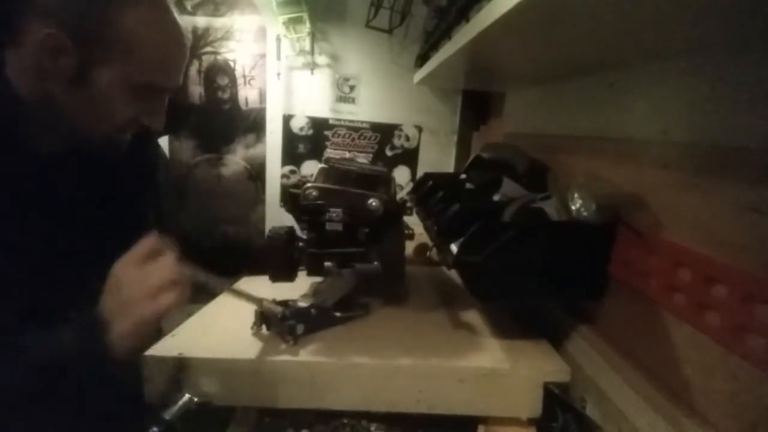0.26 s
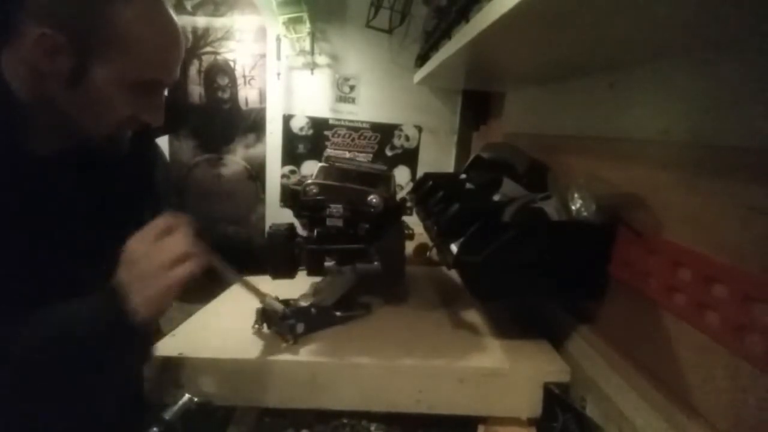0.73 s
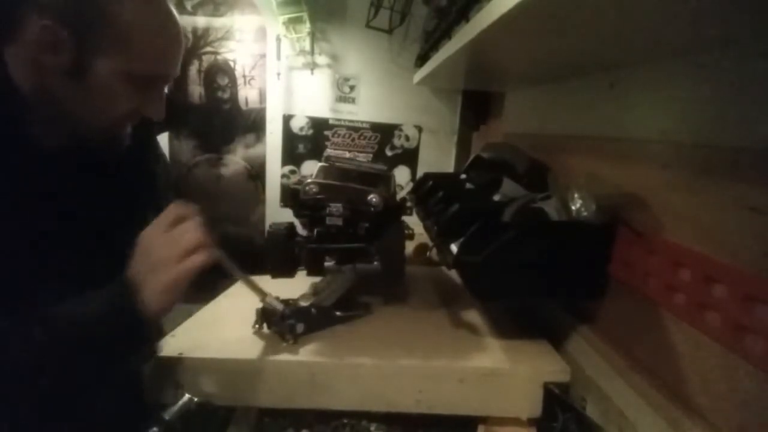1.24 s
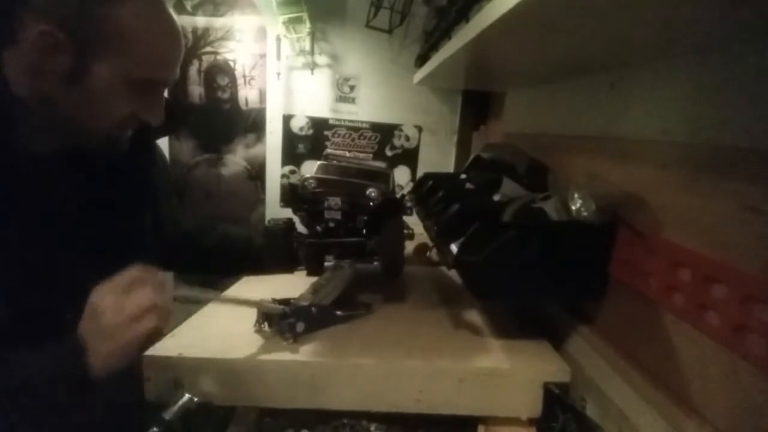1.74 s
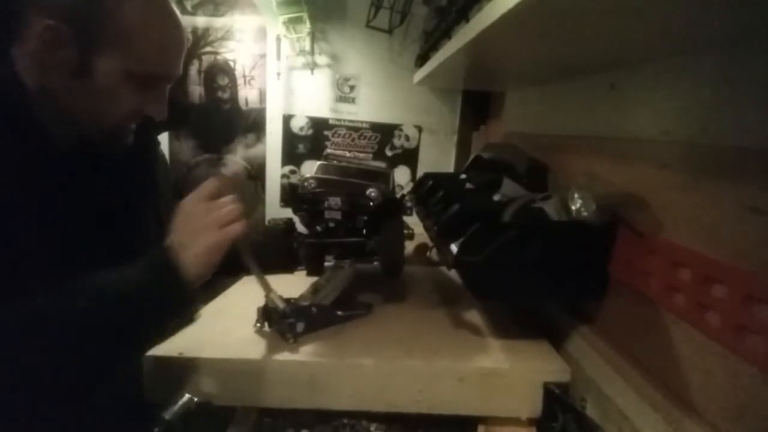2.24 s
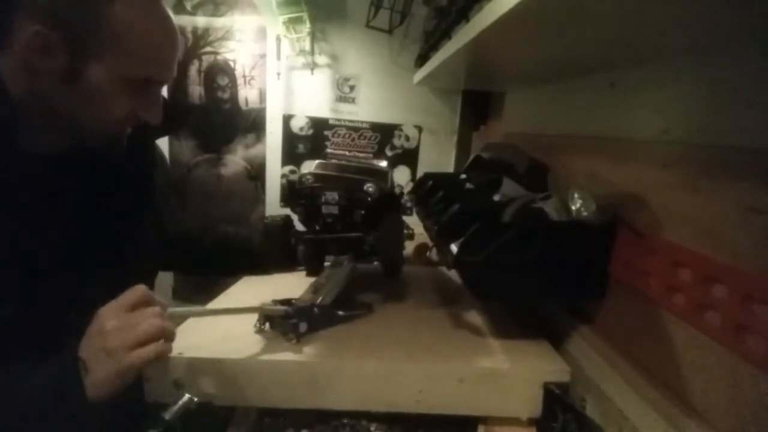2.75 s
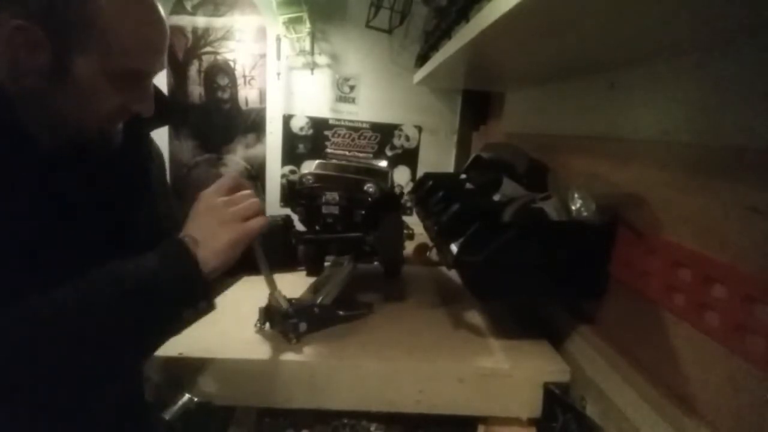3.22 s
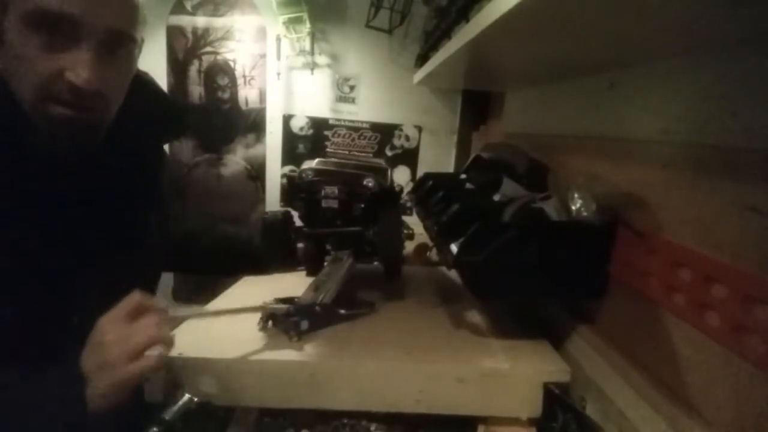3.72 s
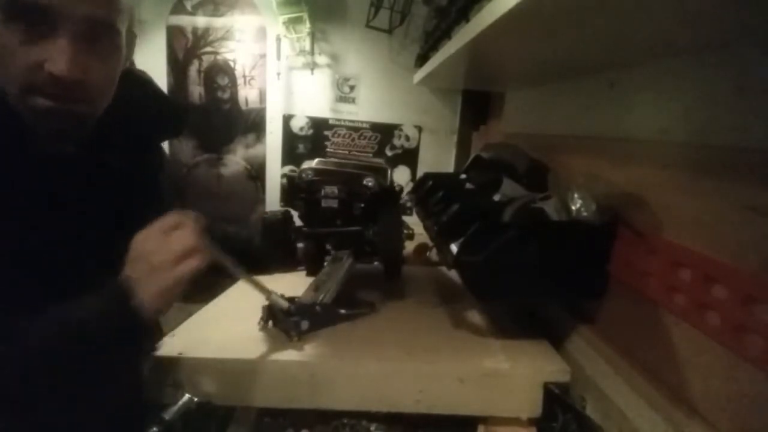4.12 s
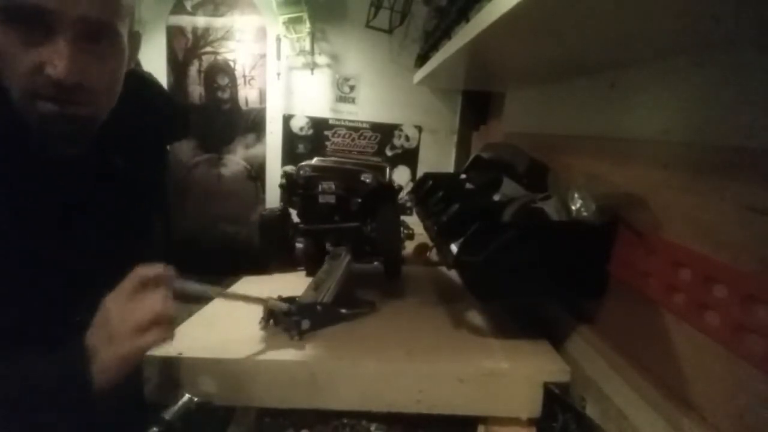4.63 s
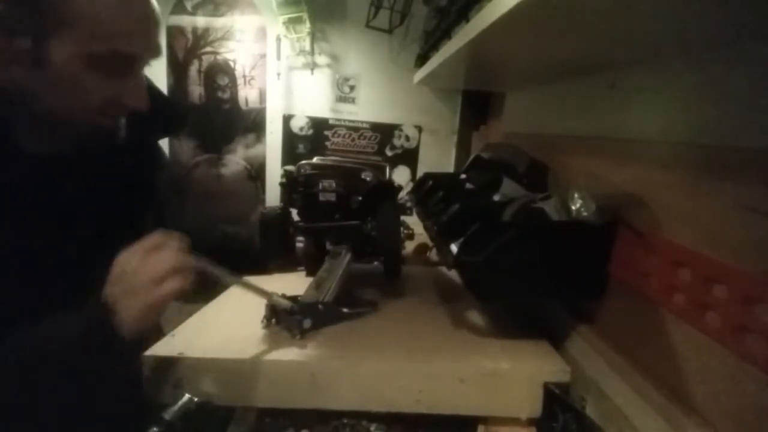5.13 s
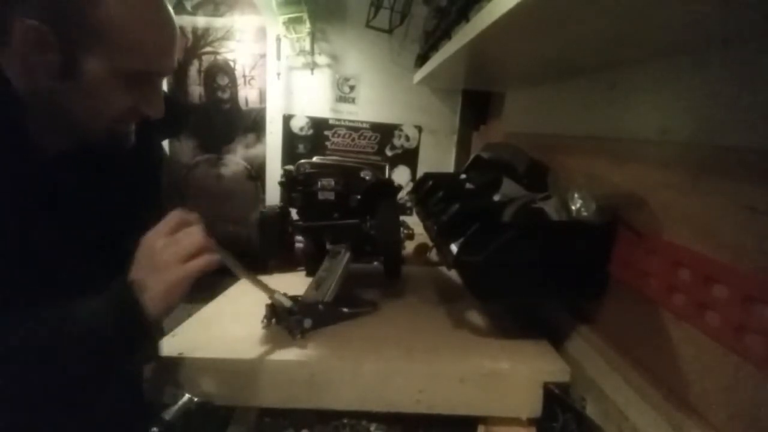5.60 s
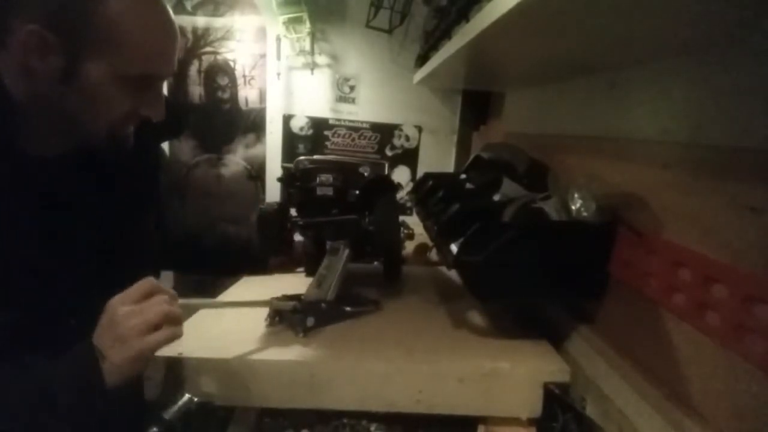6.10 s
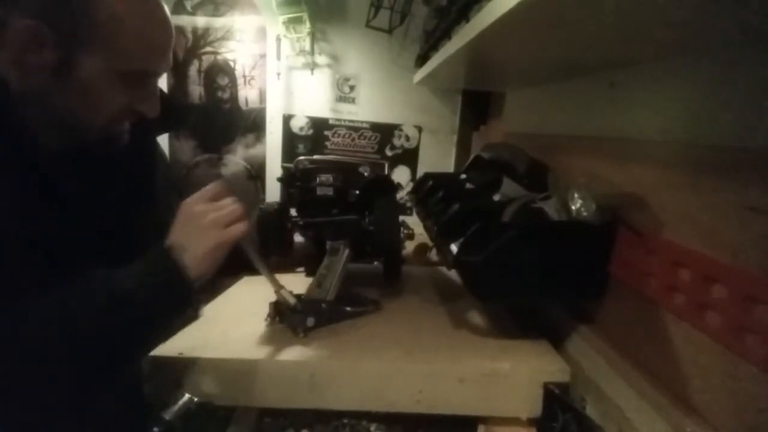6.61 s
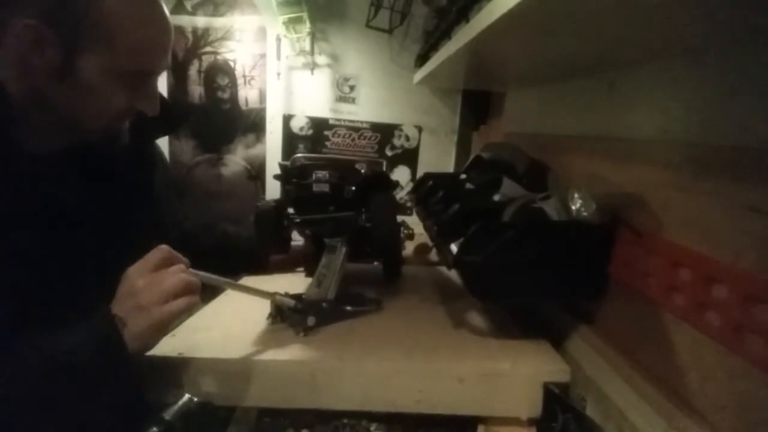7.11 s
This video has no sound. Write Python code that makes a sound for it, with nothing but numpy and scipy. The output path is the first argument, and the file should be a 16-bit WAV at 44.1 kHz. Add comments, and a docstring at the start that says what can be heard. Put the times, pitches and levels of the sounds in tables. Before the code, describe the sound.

Close to the microphone, a small metal jack is pumped on a wooden desk. Loose joints click and rattle in irregular clusters, some sharp and bright, others only dull knocks through the wood. A tiny creak comes past the middle. The quiet room answers briefly, while outside a low vehicle drone slowly rises in pitch over traffic rumble. Thin hiss lies on top, in stereo.

```python
"""Floor jack pumped on a desk

A small aluminium floor jack is pumped by hand on a wooden desk. Its loose links rattle and click as spiky noise
bursts, which ring the frame and thump the desk top through resonances. The pivot creaks once, as a rising sine.
A quiet room answers with fading noise. Outside, a vehicle drones upward in pitch as an unsteady sine, over
traffic rumble, room tone and hiss made of shaped noise. Two microphone ports sit close to the desk; their
resonance is heard as a lift of the clicks and hiss in the high treble."""
import sys
import numpy as np
from scipy import signal
from scipy.fft import rfft, irfft, next_fast_len
from scipy.io import wavfile
from scipy.ndimage import uniform_filter1d, map_coordinates

SR = 44100
rng = np.random.default_rng(int(sys.argv[2]) if len(sys.argv) > 2 else 0)


def gain_from_db(level_db):
    """Turn a decibel level (scalar or array-like) into a linear amplitude factor."""
    decades = np.asarray(level_db, float) / 20
    return 10 ** decades


def materialize(psi):
    """Save the field psi as 16-bit PCM at rate SR to the path in sys.argv[1].

    A 1-D psi becomes a single channel; in a 2-D psi each row is a channel.
    """
    bounded = np.clip(np.atleast_2d(psi).T, -1, 1)
    quanta = np.round(bounded * 32767).astype(np.int16)
    wavfile.write(sys.argv[1], SR, quanta)


N = 324249  # length of the scene in samples


# Contacts of the linkage: t/s, click level/dB, desk thump level/dB, frame ring level/dB (before fixed offsets)
CONTACTS = [(0.135, -78, -63.5, -63), (0.257, -50, -65, -60), (0.2693, -39.5, -49.5, -53),
            (0.2785, -37, -39.5, -53), (0.471, -65, -80, -64), (0.5301, -59.5, -38, -59.5),
            (0.6764, -73, -45.5, -71), (0.798, -82, -60, -64), (0.948, -55, -51.5, -54),
            (0.974, -53, -49, -59), (1.2982, -55, -74, -66), (1.3073, -44, -44, -50.5),
            (1.332, -38.5, -39.5, -48), (1.79, -78, -52.5, -85), (1.9769, -75, -63, -63),
            (2.0525, -55, -47, -51), (2.0617, -42, -45.5, -56), (2.1302, -55, -48.5, -63.5),
            (2.3807, -49.5, -68, -75), (2.391, -45.5, -44, -54), (2.4077, -40, -50, -53.5),
            (2.4657, -83, -45.5, -58.5), (2.511, -63, -68, -65), (2.6028, -60, -45.5, -63),
            (2.6276, -33, -37, -53), (2.711, -53, -66, -66), (2.9295, -63, -52.5, -59),
            (2.969, -52, -66, -82), (3.055, -72, -70, -73), (3.179, -53.5, -54, -55.5),
            (3.2049, -58, -47, -50.5), (3.2157, -46.5, -45, -57), (3.235, -44.5, -47, -66),
            (3.4384, -52, -46.5, -48), (3.444, -39, -47.5, -48.5), (3.4802, -69, -44.5, -65),
            (3.6163, -70, -58.5, -67), (3.6892, -59, -49.5, -57), (3.7208, -56, -71, -54),
            (3.752, -62, -57, -66), (3.9743, -74, -61.5, -74), (4.0159, -66, -57.5, -71),
            (4.068, -79, -57, -67), (4.353, -44.5, -48, -55.5), (4.4595, -60.5, -52, -59.5),
            (4.4756, -69, -53.5, -56.5), (4.5109, -67, -46, -62), (4.518, -73, -51, -59),
            (4.7869, -76, -49, -63), (5.0759, -66, -51.5, -70), (5.115, -62.5, -66, -67),
            (5.4112, -61, -49.5, -62), (5.4337, -51.5, -49.5, -63), (5.504, -75, -65, -64),
            (5.5982, -49.5, -57, -58), (5.6243, -42.5, -47.5, -50), (5.6342, -51, -44.5, -53),
            (5.865, -65, -49.5, -61.5), (5.9576, -59, -39, -51), (6.549, -66, -55.5, -64),
            (6.566, -69, -52, -62.5), (6.5807, -54.5, -54, -75), (6.7138, -54, -54, -57.5),
            (6.7389, -47.5, -53, -56), (6.7508, -56, -42.5, -50)]


def jack():
    """Each contact is a burst of tiny impacts that rings frame and desk and clicks in the air."""
    rattle_s, blow_s = 0.008, 0.0024  # decay times of the loose play and of the sharp first blow
    out = np.zeros((2, N + SR))
    t = np.arange(SR // 2) / SR
    for s, click_db, desk_db, ring_db in CONTACTS:
        # gentle contacts close slowly, hard ones snap
        rise_s = np.clip(0.00053 * gain_from_db(-0.5 * (click_db + 38.5)), 0.0003, 0.005)
        decay = np.exp(-t / rattle_s) + 2.0 * np.exp(-t / blow_s)
        burst = (1 - np.exp(-t / rise_s)) * decay
        # noise with random, widely varying strength makes spiky impacts
        chatter = rng.standard_normal((3, len(t))) * gain_from_db(3.93 * rng.standard_normal(len(t)))
        airborne = click(chatter[:2], burst, click_db) + frame(chatter[:2], burst, click_db, ring_db)
        desk = desk_thump(chatter[2], burst, t, desk_db)
        # airborne sound differs between the two ports, apart from a shared portion
        direct = 1.04 * airborne + 0.34 * airborne[0] + desk
        # long waves from the desk fill both ports almost alike
        boom = room(desk)
        sound = direct + room(airborne[0]) + gain_from_db(-5.0) * (boom[0] + 0.71 * boom)
        fade_out = np.minimum(1, (t[-1] - t) / 0.073)
        out[:, round(s * SR):][:, :len(t)] += sound * fade_out
    return out[:, :N]


# Colour of the click in the air: f/Hz, relative level/dB per Hz
CLICK_COLOUR = [(1200, -52), (2500, -3), (4200, -17), (5200, -4), (6200, -12.5), (6900, -7.5), (8500, -14),
                (10300, -5.5), (11600, 4.5), (12600, -3.5), (15000, -15.5)]


def click(chatter, burst, click_db):
    """The impacts heard directly in the air: coloured noise under the burst's envelope."""
    coloured = filtered(chatter, lambda hz: gain_from_db(along(CLICK_COLOUR, hz)))
    return peak(coloured * burst, click_db - 4.5)


# Resonances of the metal frame: f/Hz, width/Hz, relative level/dB
FRAME_MODES = [(1104, 130, 4), (1300, 145, -5), (1615, 220, -17), (1720, 63, -11), (1947, 65, -2),
               (2510, 170, -7), (3490, 55, -11.5), (1600, 1060, -9)]


def frame(chatter, burst, click_db, ring_db):
    """The blows excite the frame's resonances; its lower and upper modes get separate levels."""
    # the upper modes follow partly the click, mostly the ring
    snap_share = 0.27
    high_db = snap_share * click_db + (1 - snap_share) * ring_db - 1.5
    ring = filtered(chatter * burst, modes(FRAME_MODES, scatter_db=0.5))
    low = peak(passband(ring, [700, 1500], "bandpass"), ring_db + 5)
    high = peak(passband(ring, [1550, 4500], "bandpass"), high_db)
    return low + high


# Resonances of the wooden desk: f/Hz, width/Hz, relative level/dB
DESK_MODES = [(115, 66, -1), (180.5, 58, 0.5), (282.3, 74, 0.5), (367.5, 47, 2), (500, 59, -4),
              (574, 39, -13.5)]


def desk_thump(chatter, burst, t, desk_db):
    """The blows excite the desk's low resonances, and the wood swallows the treble."""
    press = 1 - np.exp(-t / 0.002)  # the blow takes a moment to load the desk
    thump = filtered(chatter * burst ** 1.34 * press, modes(DESK_MODES, scatter_db=1.0))
    return peak(passband(thump, 790, "lowpass"), desk_db + 9.5)


# How long the near surfaces ring on: f/Hz, time to fall by 60 dB/s
NEAR_SURFACES = [(150, 0.31), (500, 0.18), (2000, 0.19), (10000, 0.14)]


def room(x):
    """A fresh diffuse answer per side: near surfaces die fast, the walls ring on weakly."""
    hz, t, z = signal.stft(rng.standard_normal((2, len(x))), SR, nperseg=256)
    near = gain_from_db(-60 * t / along(NEAR_SURFACES, hz)[:, None])
    walls = gain_from_db(-22.5 - 60 * t / 0.84)
    tail = signal.istft(z * (near + walls), SR, nperseg=256)[1][:, :len(x)]
    late = np.pad(x, (150, 0))[None, :len(x)]  # the answer starts 150 samples later
    return signal.fftconvolve(late, tail / np.linalg.norm(tail[0]), axes=1)[:, :len(x)]


# The pivot sings once: t/s at its middle, f/Hz at its middle, level/dB of the sine's crest, length/s
CREAK = (4.324, 725, -55, .028)


def creak():
    """A short rough rising tone from the loaded pivot."""
    s, hz, db, length = CREAK
    t = np.arange(N) / SR - s
    envelope = gain_from_db(db + 1.92 * wobble(120)) * np.exp(-(2 * t / length) ** 2)
    return envelope * np.sin(2 * np.pi * hz * t * (1 + 1.2 * t))


# The vehicle's drone: t/s, f/Hz, level/dB
DRONE = [(0.0, 49.5, -59.5), (0.7, 48.5, -52), (1.3, 50.5, -54.5), (2.19, 50.9, -54), (2.58, 56.6, -47.5),
         (2.84, 59.7, -43.5), (3.4, 65.9, -47.5), (3.99, 67.7, -53), (5.1, 69.1, -47), (5.6, 72, -59.5),
         (6.2, 74, -62.5), (7.2, 75, -50.5), (7.35, 75.7, -68)]


def vehicle():
    """A low unsteady sine that climbs in pitch."""
    return tone(DRONE, waver=0.0082, flutter_db=2.0)


# A faint far tone: t/s, f/Hz, level/dB
WHINE = [(.4, 236, -65), (.8, 243, -66), (1.1, 251, -64), (1.4, 257, -62)]


def whine():
    """A faint, rising, unsteady sine, heard briefly near the start."""
    return tone(WHINE, waver=0.003, flutter_db=2)


# Slow rise and fall shared by the whole background: t/s, level/dB
SWELL = [(0.0, -2.5), (0.24, -10), (0.37, -0.5), (0.5, 1.5), (0.9, -0.5), (1.25, -3.5), (1.41, 2),
         (1.74, -4), (2.0, 0), (2.35, -3), (2.54, 3), (3.6, 5), (4.11, -5.5), (4.62, 2), (5.26, -5),
         (5.81, 2), (6.2, -11), (6.45, -14.5), (6.9, 5), (7.35, -13.5)]


def background():
    """Four layers of noise follow the same swell, each by its own share."""
    swell_db, = curves(SWELL)
    flicker = wobble(35)  # room tone and hiss flicker quickly together
    low = desk_sway(swell_db) + traffic_rumble(swell_db)
    return low + room_tone(swell_db, flicker) + microphone_hiss(swell_db, flicker)


# Colour of the swaying desk: f/Hz, relative level/dB per Hz
SWAY_COLOUR = [(10, -27.5), (22, -4.5), (40, 8), (48, -23), (70, -67)]


def desk_sway(swell_db):
    """The desk sways under the microphones: very low noise, nearly independent on the two sides."""
    return gain_from_db(-54.5 + 0.7 * swell_db + 1.5 * wobble(4.14)) * rush(SWAY_COLOUR, alike=[(30, 0.1)])


# Colour of the traffic: f/Hz, relative level/dB per Hz
RUMBLE_COLOUR = [(30, -25.5), (45, 3), (70, 3.5), (125, 1.5), (160, -8.5), (220, -20), (300, -55)]


def traffic_rumble(swell_db):
    """Low traffic noise that wavers slowly."""
    return gain_from_db(-51 + 0.32 * swell_db + 0.64 * wobble(2.92)) * rush(RUMBLE_COLOUR)


# Colour of the room's own tone: f/Hz, relative level/dB per Hz
ROOM_TONE_COLOUR = [(88, -23.5), (150, -5.5), (285, -10), (381, -12.5), (420, -12.5), (493, -12.5),
                    (838, -20), (1140, -21), (3030, -39), (7000, -67), (9100, -81), (15400, -120)]


def room_tone(swell_db, flicker):
    """The quiet room's own noise, falling steeply towards the treble."""
    return gain_from_db(-59 + 0.33 * swell_db + 1.32 * flicker) * rush(ROOM_TONE_COLOUR)


# Colour of the hiss: f/Hz, relative level/dB per Hz
HISS_COLOUR = [(2940, -2), (5000, -10), (5550, -9.5), (6280, -17), (6930, -11.5), (7480, -43),
               (9120, -24.5), (11500, 2), (13000, -6.5), (15500, -5.5)]


def microphone_hiss(swell_db, flicker):
    """Treble noise of the microphones, lifted around their port resonance."""
    return gain_from_db(-72 + 0.85 * swell_db + 1.2 * flicker) * rush(HISS_COLOUR)


# How alike left and right are: f/Hz, likeness (1 = identical)
LIKENESS = [(60, 0.99), (250, 0.75), (500, 0.54), (1500, 0.28), (12000, 0.074)]


def rush(spectrum, alike=LIKENESS):
    """Coloured stereo noise of rms 1; mid and side are mixed to give the wanted likeness."""
    def shape(hz):
        angle = np.arccos(np.clip(along(alike, hz), -1, 1)) / 2
        return gain_from_db(along(spectrum, hz)) * [np.cos(angle), np.sin(angle)]
    mid, side = filtered(rng.standard_normal((2, N)), shape)
    return unit(np.array([mid + side, mid - side]))


def tone(rows, waver, flutter_db):
    """A sine unsteady in pitch and level that sounds only within its table."""
    hz, db = curves(rows)
    t = np.arange(N) / SR
    on = np.clip(np.minimum(t - rows[0][0], rows[-1][0] - t) / 0.051, 0, 1)
    phase = 2 * np.pi * np.cumsum(hz * (1 + waver * wobble(7.2))) / SR
    return np.sqrt(2) * on * gain_from_db(db + flutter_db * wobble(5.067)) * np.sin(phase)


def modes(table, scatter_db):
    """Causal resonances as a frequency response, with new strengths and signs at each call."""
    gains = [gain_from_db(db + scatter_db * rng.standard_normal()) * rng.choice([-1, 1]) for _, _, db in table]

    def response(f):
        return sum(gain * 1j * f * width / (centre ** 2 - f * f + 1j * f * width)
                   for gain, (centre, width, _) in zip(gains, table))
    return response


def peak(x, db):
    """Scales a burst so that its loudest 200 samples have a power 7 dB under db, averaged over sides."""
    power = np.abs(uniform_filter1d(x ** 2, size=200, axis=-1)).max(axis=-1).mean()
    return x * gain_from_db(db - 7) / np.sqrt(power)


def passband(x, hz, kind):
    """A steep causal filter."""
    return signal.sosfilt(signal.butter(4, np.clip(hz, 50, SR / 2.2), kind, fs=SR, output="sos"), x)


def filtered(x, response):
    """x shaped by a complex response of frequency."""
    m = next_fast_len(x.shape[-1] + 8192)
    spectrum = rfft(x, m) * response(np.fft.rfftfreq(m, 1 / SR))
    return irfft(spectrum, m)[..., :x.shape[-1]]


def along(points, hz):
    """Reads a curve of (f/Hz, value) points on a log axis."""
    f, v = np.transpose(points)
    return np.interp(np.log(hz + 1), np.log(f + 1), v)


def curves(rows):
    """One value per sample for each column after the time."""
    s, *cols = np.transpose(rows)
    return [np.interp(np.arange(N) / SR, s, c) for c in cols]


def wobble(rate):
    """A smooth random curve with rate knots a second."""
    knots = rng.standard_normal(int(N * rate / SR) + 4)
    return map_coordinates(knots, [np.arange(N) * rate / SR])


def unit(x):
    """x at rms 1."""
    return x / np.sqrt(np.mean(x ** 2) + 1e-20)


def scene():
    """Jack, pivot, far tones and background together."""
    return jack() + creak() + vehicle() + whine() + background()


def roll_off(x):
    """The treble ends steeply here."""
    return signal.sosfilt(signal.butter(12, 16470, fs=SR, output="sos"), x)


# Level difference of the two ports: f/Hz, left minus right level/dB
PORT_LEVEL = [(30, 11.5), (60, 4), (250, 3.5), (600, 2), (1400, 0.1), (5000, -3.5), (10500, 6),
              (14000, -0.2)]
# Phase difference of the two ports: f/Hz, lead of the left/radians
PORT_PHASE = [(45, -0.8), (65, -0.3), (130, -0.5), (300, 0.88), (600, -1.2), (860, -1.7), (1210, -2.5),
              (1890, -1.54), (9900, 14.5), (13900, 5.5)]


def record(dry):
    """The two ports differ in level and phase; nothing is kept above the band limit."""
    top_hz = 15650
    half = [0.5, -0.5]  # each side takes half of the difference

    def ports(hz):
        level = gain_from_db(np.outer(half, along(PORT_LEVEL, hz)))
        phase = np.exp(1j * np.outer(half, along(PORT_PHASE, hz)))
        return level * phase * (hz < top_hz)
    mix = filtered(dry, ports)
    return roll_off(mix)


dry = scene()
out = record(dry)
materialize(out)
```